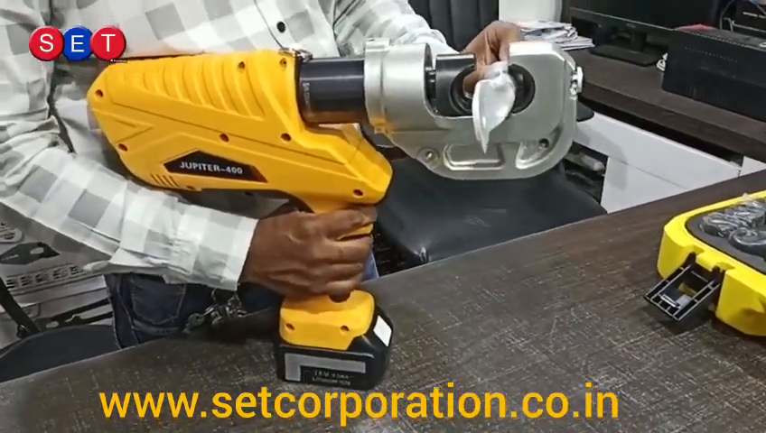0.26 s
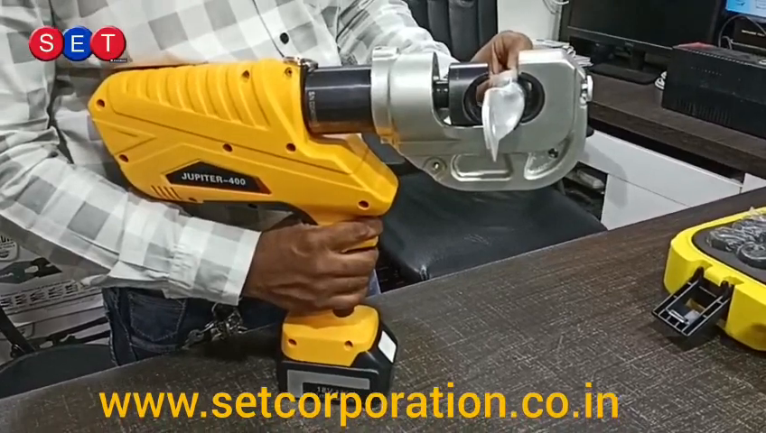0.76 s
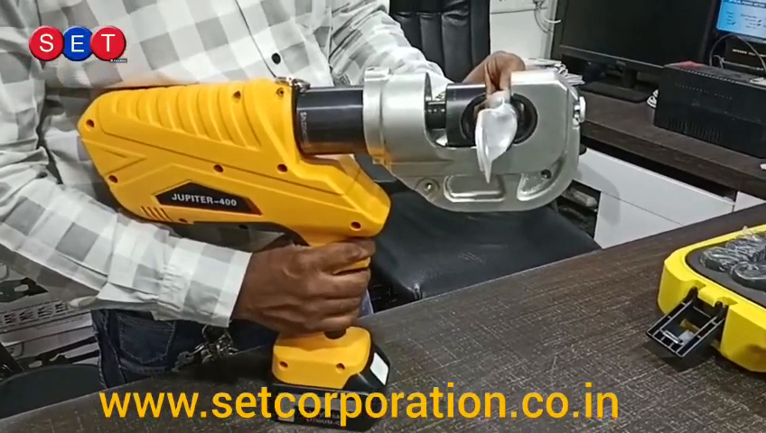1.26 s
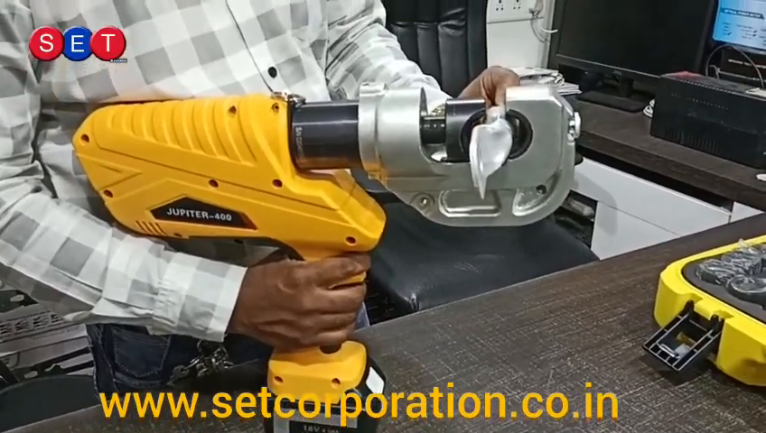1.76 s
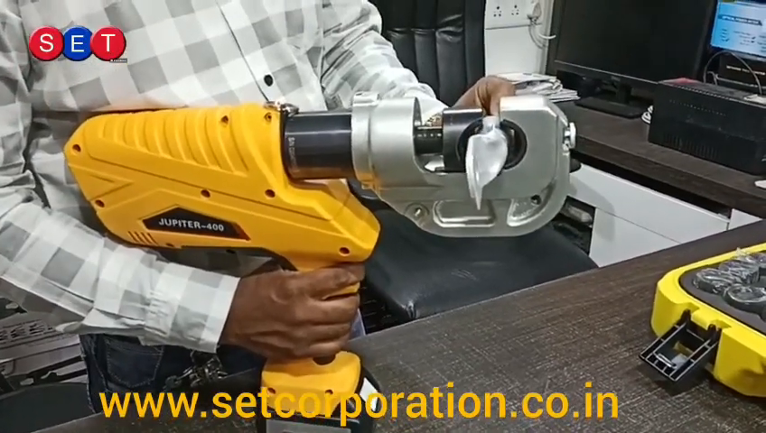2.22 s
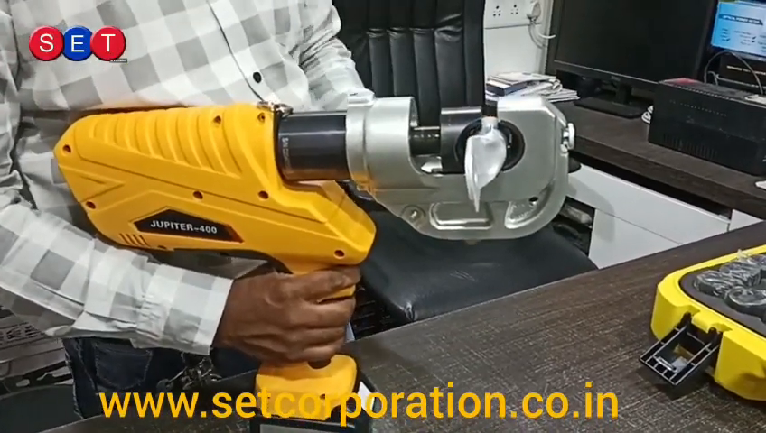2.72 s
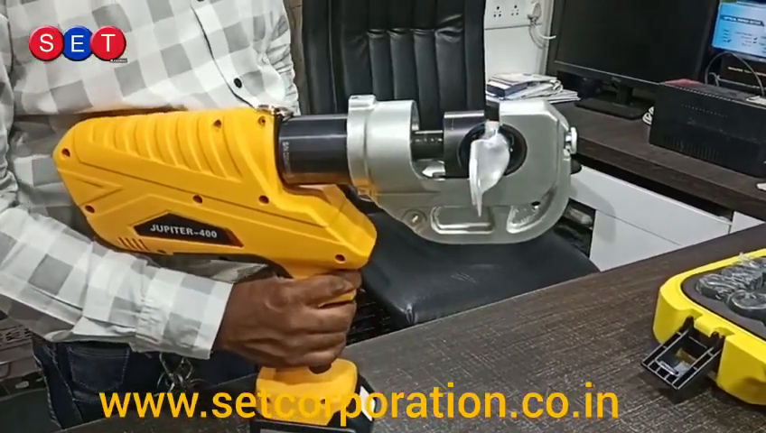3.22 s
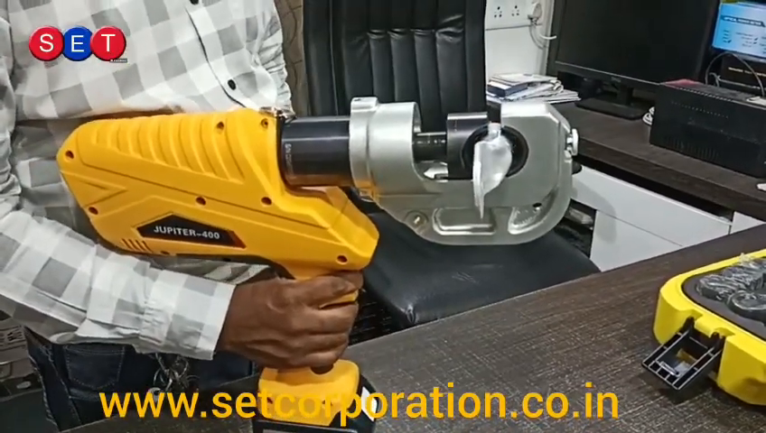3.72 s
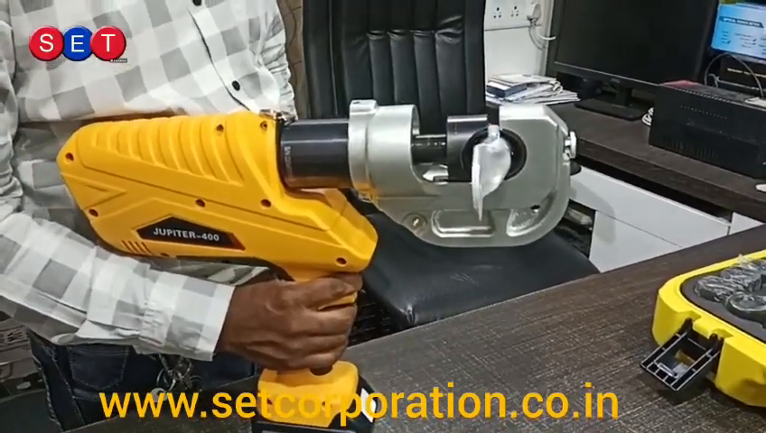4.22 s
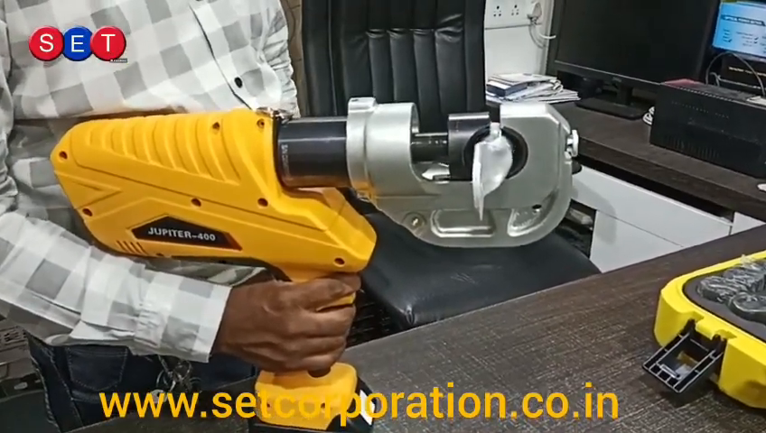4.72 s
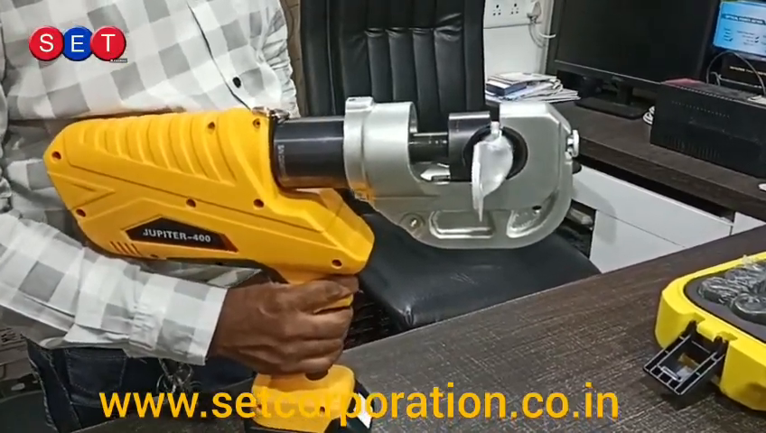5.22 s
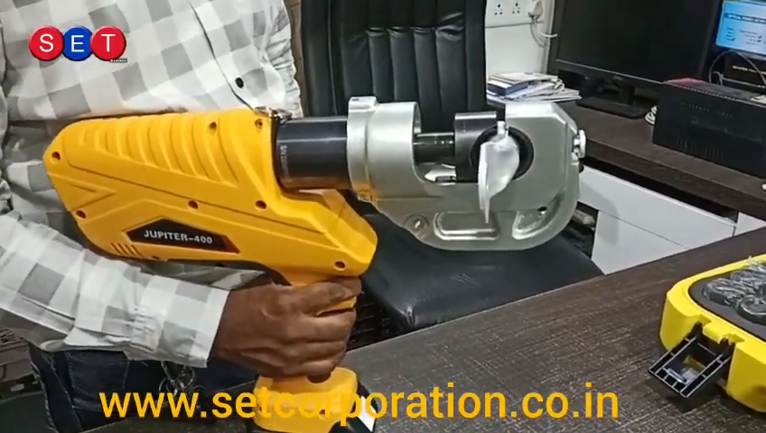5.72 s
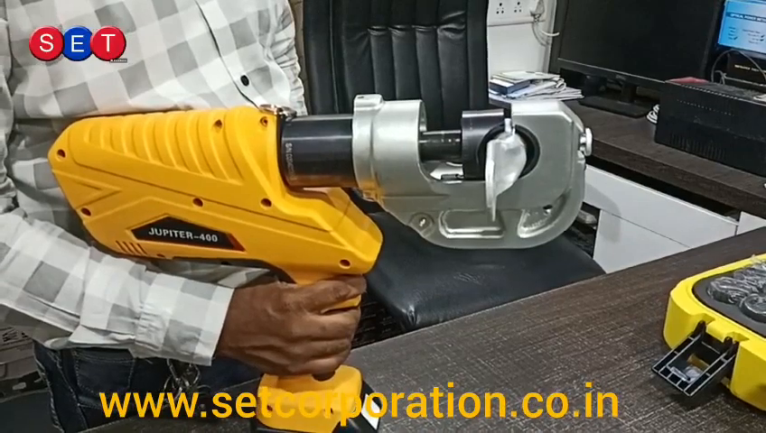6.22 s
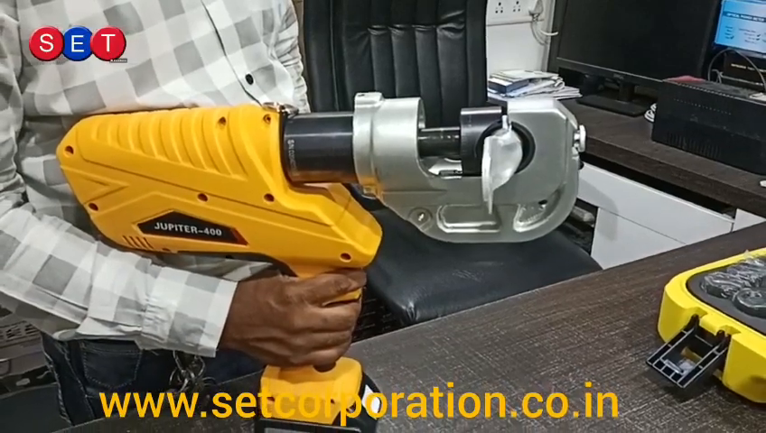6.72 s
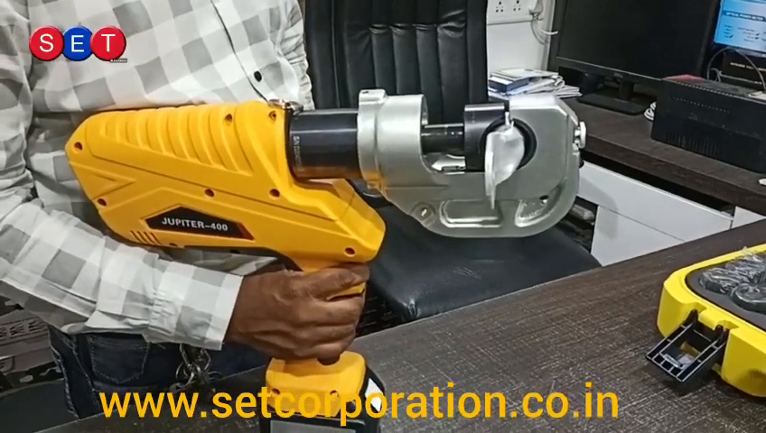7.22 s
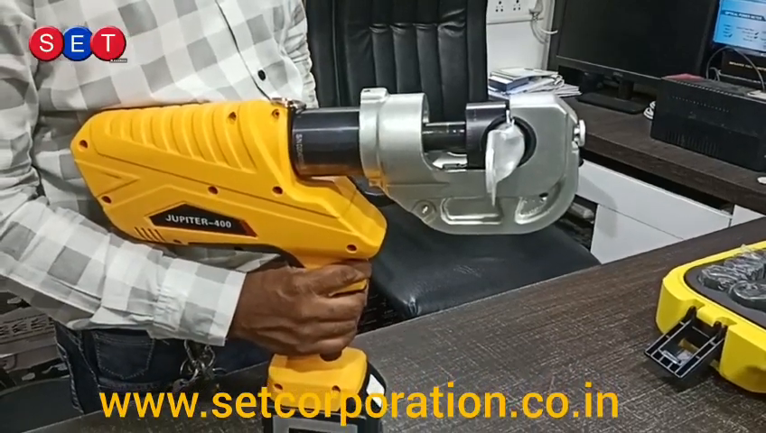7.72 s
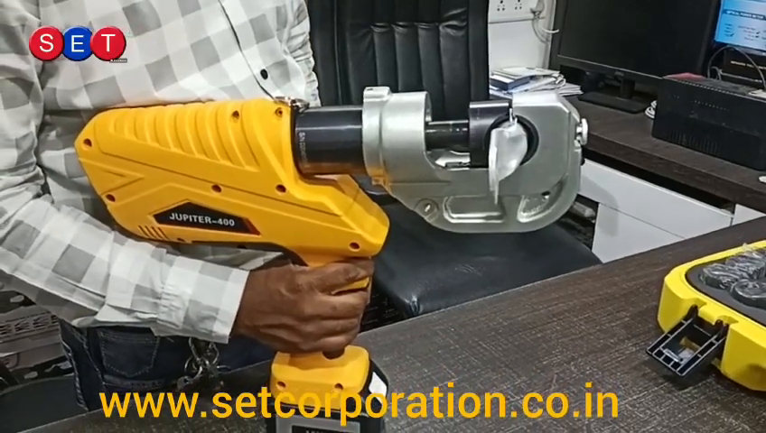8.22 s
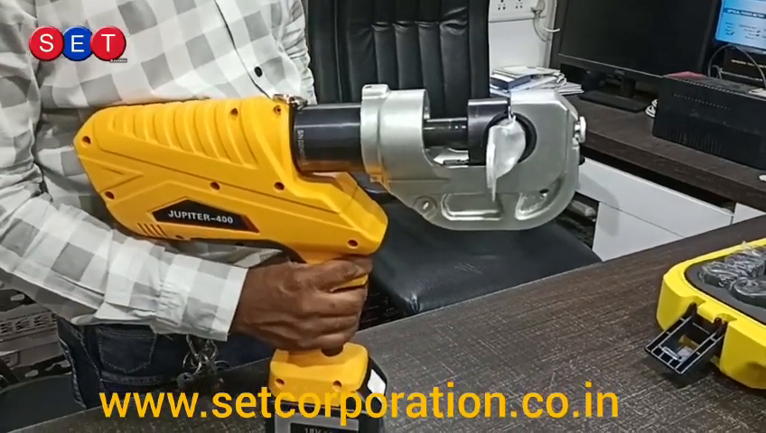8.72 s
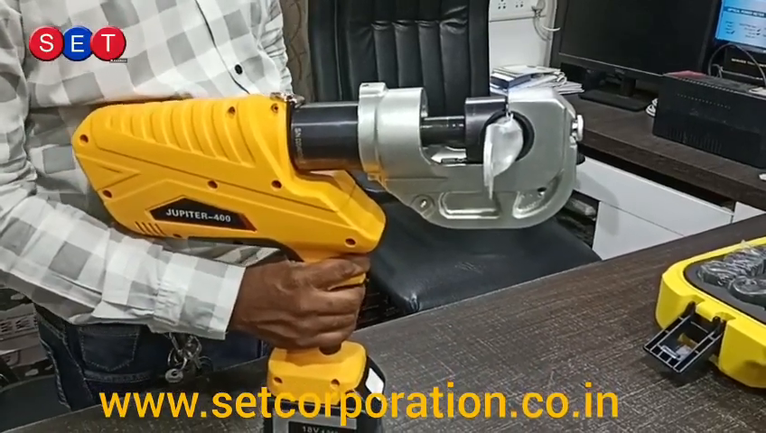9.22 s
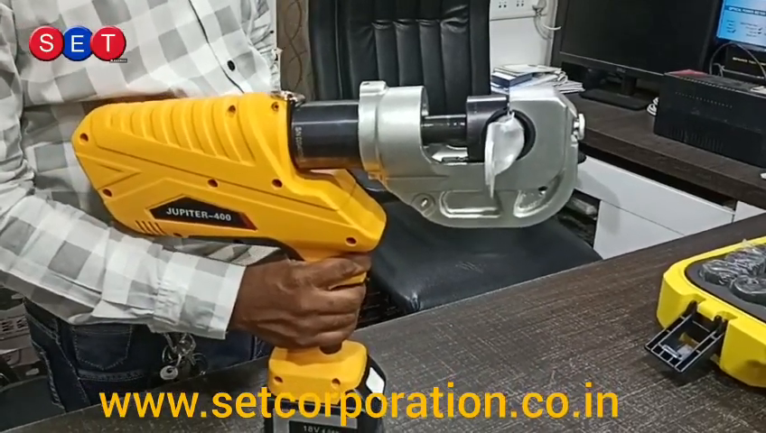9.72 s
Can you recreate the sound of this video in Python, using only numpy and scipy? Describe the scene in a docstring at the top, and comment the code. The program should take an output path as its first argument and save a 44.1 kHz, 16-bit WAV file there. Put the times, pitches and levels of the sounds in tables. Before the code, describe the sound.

The motor is already running at the start: bright, raspy housing rattle, high gear whine and a purring pump around eighteen beats a second. Steel valve ticks sharpen over the first few seconds, then the whine drops slightly and leans left. Towards the end the strokes slow a little, the throb deepens and squealing oil tones flutter in each stroke. It never stops. Close stereo microphones, dry small office.

```python
"""Hydraulic press in a small office

A hand-held press works under rising load, close to a pair of microphone ports.
A geared motor whines over the noise rattle of its housing; each pump stroke drags the pitch down.
Two valves knock in every stroke as struck steel modes, and gliding fuzzy tones give the oil's
brief whistles, which change as pressure builds. Low bumps of hands lie over a faint rumble."""
import sys
import numpy as np
from scipy import signal
from scipy.fft import rfft, irfft
from scipy.io import wavfile
from scipy.ndimage import uniform_filter1d

SR = 44100
rng = np.random.default_rng(int(sys.argv[2]) if len(sys.argv) > 2 else 0)


def store_wav(level_fs):
    """Save 16-bit WAV to argv[1]."""
    pcm = np.round(np.clip(np.atleast_2d(level_fs), -1, 1) * 32767)
    wavfile.write(sys.argv[1], SR, pcm.T.astype(np.int16))


def decibels_to_gain(level_db):
    """Convert a level in decibels to a linear amplitude gain (20 dB per decade)."""
    exponent = np.asarray(level_db, float) / 20
    return 10 ** exponent


N = 439236
T = np.arange(N) / SR
HZ = np.fft.rfftfreq(N, 1 / SR)

# hands shift on the tool and the table: (time [s], length [s], peak level [dB])
HAND_BUMPS = [(.05, 0.45, -65), (0.33, 0.21, -59), (0.573, 0.17, -53), (.9, 0.41, -62), (1.79, .1, -70),
              (2.202, 0.082, -68), (2.519, .1, -67), (3.08, 0.23, -58), (3.354, 0.13, -60),
              (3.52, .15, -61), (3.83, 0.33, -65), (4.0, 0.53, -60), (4.44, 0.29, -56), (7.4, 0.11, -69)]
# pump strokes done so far: (time [s], count [strokes])
STROKE_COUNT = [(0.0, -0.14), (1.0, 18.23), (2.0, 36.51), (3.0, 54.91), (4.0, 73.18), (5.0, 91.25),
                (6.0, 109.15), (7.0, 126.87), (7.5, 135.64), (8.0, 144.29), (8.5, 152.79), (9.0, 161.11),
                (9.5, 169.3), (9.96, 176.74)]
# oil pressure and what follows it:
# (time [s], load [0-1], rattle level [dB], rattle left-right [dB], valve knock level [dB])
PRESS_LOAD = [(0, 0.18, -21, -0.5, -44), (1, 0.15, -20.5, -1.5, -41), (2, 0.29, -21, -1, -38.5),
              (3, 0.48, -21.5, -1, -35), (4, 0.44, -22, 1.5, -34), (5, 0.49, -22.5, 1, -34),
              (6, 0.5, -22.5, 2, -35.5), (7, 0.65, -22.5, 1.5, -37), (8, 0.84, -22, 1.5, -36.5),
              (9, 0.96, -22, 3, -40.5), (9.96, 0.95, -21.5, 1.5, -34)]
# brief whistles of oil and pump, once a stroke: (place in the stroke [strokes], length [strokes],
# start [Hz], end [Hz], level before fuzz and low cut at no load [dB], at full load [dB])
WHISTLES = [(0, .42, 1640, 1400, -75, -24.5), (.0, 0.24, 3960, 3900, -80, -27.5),
            (0.1, .34, 3420, 3200, -130, -25), (-0.039, .26, 700, 680, -67, -33),
            (-0.043, 0.39, 7700, 6000, -80, -36), (0.49, .3, 1120, 1200, -23.5, -68),
            (0.2, .34, 1540, 1500, -25, -62), (.24, .24, 860, 840, -25, -90)]
# modes of the steel pump head:
# (frequency [Hz], t60 [s], relative level for the outlet valve [dB], for the inlet valve [dB])
HEAD_MODES = [(1100, .016, -16, -14), (1580, .026, -4, -10), (1740, .03, -4, -10), (2060, .02, -6, -9),
              (2240, .045, -5, -4), (2540, .03, -4, -7), (2750, .035, -3, -2), (2880, .03, -11, -5),
              (3250, .025, -11, -5), (3420, .024, -6, -9), (3720, .02, -14, -12), (4700, .008, -24, -3),
              (5480, .018, -2, -16), (5760, .012, -5, -14), (7800, .008, -20, -24)]
# valve closings, which move as pressure builds: (time [s], outlet place [strokes], inlet place [strokes],
# inlet against the knock [dB], high head modes for the outlet [dB], for the inlet [dB])
VALVE_TIMING = [(0, .2, .48, 1, -8, -8), (2, .23, .48, -4, -7, -5), (3.5, .25, .48, -8, -5, 0),
                (4.7, .195, .44, -8, 1, 4), (6, .155, .38, -6, 5, 4), (7.2, .135, .35, -4, 5, 4),
                (8, .12, .335, 3, -1, 2), (9.96, .13, .35, 1, -8, 5)]
# rattle spectrum under light load: (frequency [Hz], relative density [dB per Hz])
LIGHT_RATTLE = [(88, -62), (150, -34.5), (345, -13.5), (461, -9.5), (628, -7.5), (1360, -10), (1720, -6),
                (4600, -13.5), (5270, -1), (5700, -11), (7330, -14.5), (7920, -35.5), (10600, -23),
                (13100, -23), (15300, -33)]
# rattle spectrum under heavy load: (frequency [Hz], relative density [dB per Hz])
HEAVY_RATTLE = [(88, -66), (150, -45), (273, -17), (479, -24), (628, -1.5), (889, -19), (1500, -0.5),
                (1970, -4), (3940, -5.5), (4350, -10), (4950, -7.5), (5330, -6), (6780, -11), (9060, -32),
                (12100, -18.5), (15300, -24.5)]
# housing resonances and hollows:
# (frequency [Hz], width [Hz], boost at light load [dB], boost at heavy load [dB])
HOUSING_MODES = [(258, 133, 12, 3.5), (321, 17, -4, -2.5), (397, 14, 9.5, -1), (452, 106, -14, -17),
                 (620, 41, 1, 1.5), (686, 29, 3, 3.5), (814, 27, 8, 5.5), (900, 210, -5.5, 2.5),
                 (993, 112, 8, 13.5), (1231, 42, 7, 5), (1572, 35, 6, 0), (1748, 113, 8, 6.5),
                 (2020, 28, 0, 3), (2242, 53, 5.5, 9), (2460, 43, 0, 4), (2680, 34, -14, 3.5),
                 (2860, 82, -1.5, 2.5), (3175, 130, 7.5, 5.5), (5120, 170, 2.5, 5.5), (6720, 520, 2.5, 1.5),
                 (9890, 410, -16, -3.5), (9770, 260, 7, 8)]
# gear mesh: (time [s], pitch running free [Hz], level [dB], left-right [dB])
GEAR_WHINE = [(0, 5320, -27, -9), (.6, 5340, -24.5, -1), (2.0, 5342, -22.5, 4), (2.7, 5332, -25, 1),
              (3.2, 5328, -27, 15), (3.7, 5330, -26, 3.5), (4.1, 5285, -31, 15), (5, 5233, -30.5, 14.5),
              (6, 5232, -29, 14.5), (6.6, 5218, -28, 9.5), (7.2, 5185, -34.5, 19.5), (7.7, 5145, -36.5, 18),
              (8.1, 5105, -37, 8), (8.8, 5080, -38, 8), (9.96, 5065, -40, 2)]
# other motor tones: (time [s], overtone level [dB], shaft tone level [dB],
# swing of the whine's level within a stroke [dB])
MOTOR_TONES = [(0, -48, -40, 2.5), (1.5, -51, -39.5, 3), (2.7, -43, -41, -0.5), (3.1, -49, -44, -4),
               (3.9, -50, -46, -6.5), (4.6, -52, -45.5, 0.5), (6.4, -66, -44, 6), (7, -60, -49, 2),
               (7.5, -58, -51, 15), (8, -62, -51.5, 9), (9.96, -67, -61.5, 13)]
# two fuzzy gear tones that follow the shaft: (order of each [cycles per shaft turn])
GEAR_ORDERS = (4.98, 8.66)
# their levels at the left port: (time [s], first tone [dB], second tone [dB])
GEAR_LEVELS = [(0, -40, -52), (1, -36, -48), (2.3, -37, -40), (4.3, -38, -38), (6, -40, -38),
               (6.9, -41, -37), (7.4, -45, -47), (9.96, -55, -58)]
# port pair: (frequency [Hz], likeness [0-1], lag of the left [rad],
# swing of that lag by the desk echoes [rad], left-right [dB])
PORT_PAIR = [(100, 0.9, .1, .05, -2.5), (209, 0.93, 0.29, 0.14, 6.5), (530, 0.77, 0.31, 0.6, -2.5),
             (900, 0.81, 0.91, 0.16, -1.5), (1545, 0.49, 1.84, 0.06, -1.5), (1825, 0.77, 2.9, 0.9, 2.5),
             (2550, 0.38, 5.15, 2.85, 1.5), (3300, 0.36, 2.2, 5.3, -4), (4100, 0.48, 1.84, 0.66, 3),
             (4800, 1, 2, 0.61, -6), (5130, 0.47, 13.1, 2.5, 3), (6920, 0.34, 7.2, 4.2, 1.5),
             (8860, 0.5, 28, 1.3, 13.5), (11470, 0.4, 6.6, 1, 3.5), (14600, .25, 14.7, 1.4, 2)]
# desk echoes: (delay of each [s])
DESK_ECHOES = (.0031, .0053, .0082)


def evened(x):
    """Scales to rms 1."""
    return x / np.sqrt(np.mean(x ** 2) + 1e-20)


def curves(rows):
    """Columns of a time table, one value a sample."""
    s, *columns = np.transpose(rows)
    return [np.interp(T, s, c) for c in columns]


def drift(hz, channels=1):
    """Slow chance: noise rolled off above hz, rms 1."""
    spectrum = rfft(rng.standard_normal((channels, N)))
    return evened(irfft(spectrum / (1 + (HZ / hz) ** 2), N))


def fuzzy(center, depth, hz, channels):
    """Complex gain that wanders in size and phase, to make a tone fuzzy."""
    return center + depth * (drift(hz, channels) + 1j * drift(hz, channels))


def stroke():
    """Strokes done; the pump's speed changes smoothly."""
    rate = np.gradient(curves(STROKE_COUNT)[0]) * SR
    rate = uniform_filter1d(rate, size=SR // 2, mode="nearest")
    return STROKE_COUNT[0][1] + np.cumsum(rate) / SR


def office(x):
    """Direct sound plus a short tail of its own at each port: fixed bands that a gliding tone beats through."""
    t60_s, tail_db, start_s = .25, -11, .004
    t = T[:SR // 2]
    tail = rng.standard_normal((2, len(t))) * decibels_to_gain(-60 * t / t60_s) * (t > start_s)
    tail = decibels_to_gain(tail_db) * tail / np.linalg.norm(tail, axis=1, keepdims=True)
    echoed = signal.oaconvolve(x, tail, axes=1)[:, :N]
    return (x + echoed) / np.sqrt(1 + decibels_to_gain(2 * tail_db))


def ports(pair):
    """Two renderings of one source: the right port hears part of the left's sound, earlier, and part of its own."""
    hz, *columns = np.transpose(PORT_PAIR)
    like, lag, spread, pan_db = (np.interp(HZ, hz, c) for c in columns)
    # the echoes swing the phase between the ports back and forth
    turns = sum(np.sin(2 * np.pi * HZ * s) for s in DESK_ECHOES) / np.sqrt(len(DESK_ECHOES))
    left, other = rfft(pair)
    shared = like * np.exp(1j * (lag + spread * turns)) * left
    right = shared + np.sqrt(1 - like ** 2) * other
    return irfft([left * decibels_to_gain(pan_db / 2), right * decibels_to_gain(-pan_db / 2)], N)


def no_bass(x, hz):
    """Takes away the sound below hz, steeply."""
    return irfft(rfft(x) * (HZ / hz) ** 4 / (1 + (HZ / hz) ** 4), N)


def rumble():
    """Low lumps: each bump swells and fades over a faint, uneven floor of band-limited noise."""
    floor_db, lumps_db = -82, 4
    band = (HZ / 85) ** 2.6 / (1 + (HZ / 85) ** 2.0) / (1 + (HZ / 130) ** 3)
    level = decibels_to_gain(floor_db + lumps_db * drift(9))
    for s, length, db in HAND_BUMPS:
        level = level + decibels_to_gain(db) * np.exp(-(2 * (T - s) / length) ** 2)
    return level * evened(irfft(rfft(rng.standard_normal((2, N))) * band, N))


def squeal():
    """Short fuzzy whistles glide through their part of the stroke; pressure brings some in and stills others."""
    load, done = curves(PRESS_LOAD)[0], stroke()
    out = np.zeros((2, N))
    for place, share, start_hz, end_hz, light_db, heavy_db in WHISTLES:
        part = np.clip((done - place) % 1 / share, 0, 1)
        phase = 2 * np.pi * np.cumsum(start_hz + (end_hz - start_hz) * part) / SR
        tone = (fuzzy(1.1, .6, 150, 2) * np.exp(1j * phase)).real
        level = decibels_to_gain(light_db + (heavy_db - light_db) * load)
        out += level * np.sin(np.pi * part) ** 0.86 * tone
    return out


def valves():
    """Twice a stroke a ball valve slams and chatters for a few ms; the steel head rings differently each time."""
    scatter_db, detune, late_s = 2, .008, .0006  # rms spread of mode level, mode pitch [share] and timing
    sag_per_s = 2.5  # the ring falls as pressure lets go
    high_hz = 4200
    knock_db, done = curves(PRESS_LOAD)[3], stroke()
    outlet, inlet, inlet_db, *high_db = curves(VALVE_TIMING)
    t, out = T[:1400], np.zeros((2, N))
    hz, t60, *mode_db = np.transpose(HEAD_MODES)[:, :, None]
    signs = (-1) ** np.arange(len(HEAD_MODES))[:, None]
    is_high = hz[:, 0] > high_hz
    for k, (place, db) in enumerate([(outlet, 0), (inlet, inlet_db)]):
        rings, power = np.zeros((2, N + 2 * len(t))), 0
        closings = np.flatnonzero(np.diff(np.floor(done - place)) > 0)
        for start in closings:
            late, size_db = rng.standard_normal(2)
            gain, tune = rng.standard_normal((2, len(HEAD_MODES), 1))
            turns = hz * (1 + detune * tune) * (t - sag_per_s * t ** 2 / 2)
            decay = decibels_to_gain(mode_db[k] + scatter_db * gain - 60 * t / t60)
            modes = signs * decay * np.sin(2 * np.pi * turns)
            blow = np.exp(-t[:600] / .003) * rng.standard_normal((2, 600))
            blow[:, 0] += 13  # the slam ahead of the chatter
            low = signal.fftconvolve(blow, modes[~is_high].sum(0)[None], axes=1)
            high = signal.fftconvolve(blow, modes[is_high].sum(0)[None], axes=1)
            power += np.sum(low ** 2) / (2 * N)
            first = max(start + int(late_s * SR * late), 0)
            ring = low + decibels_to_gain(high_db[k][start]) * high
            rings[:, first:first + low.shape[1]] += decibels_to_gain(size_db) * ring
        out += decibels_to_gain(knock_db + db) * rings[:, :N] / np.sqrt(power)
    return out


def rattle():
    """Dense small tooth and bearing impacts, as noise, colour the housing; louder while the pump pushes."""
    load, db, pan_db, _ = curves(PRESS_LOAD)
    done = stroke()
    grain = decibels_to_gain(.8 * drift(200) + .4 * drift(16))
    noise = grain * rng.standard_normal((2, N))
    bass = 1 / (1 + (HZ / 520) ** 6)
    middle = 1 / (1 + (1250 / (HZ + 1)) ** 6) / (1 + (HZ / 4200) ** 8)
    treble = 1 - 1 / (1 + (HZ / 6500) ** 8)
    between = 1 - middle - bass - treble
    # the push loads the gears: the middle throbs most, and the bass turns lumpy under load
    throb = load ** 2 * np.cos(2 * np.pi * (done - .27))
    bass_db = (2.3 + 1.2 * load ** 4) * drift(19)
    middle_db = 3.2 * throb
    between_db = .3 * throb + 1.3 * drift(15.0)
    treble_db = 1.2 * np.cos(2 * np.pi * (done - .2)) + .5 * drift(3.9)
    hits = bass * rfft(noise * decibels_to_gain(bass_db))
    hits += middle * rfft(noise * decibels_to_gain(middle_db))
    hits += between * rfft(noise * decibels_to_gain(between_db))
    hits += treble * rfft(noise * decibels_to_gain(treble_db))
    hz, width, *boosts_db = np.transpose(HOUSING_MODES)
    layers = []
    for table, boost_db in zip((LIGHT_RATTLE, HEAVY_RATTLE), boosts_db):
        f, level_db = np.transpose(table)
        slope_db = np.interp(np.log(HZ + 1), np.log(f), level_db)
        body_db = sum(b / (1 + (2 * (HZ - c) / w) ** 2) for c, w, b in zip(hz, width, boost_db))
        layers.append(evened(irfft(hits * decibels_to_gain(slope_db + body_db), N)))
    light, heavy = layers
    sides = decibels_to_gain(db + np.outer([.5, -.5], pan_db))
    return sides * ((1 - load) * light + load * heavy)


def motor():
    """Gear mesh tone, its overtone, the shaft tone and two gear tones; the pump's push slows them once a stroke."""
    teeth = 15
    idle_hz, drop_hz, drop_per_hz, deepest_hz = 5330, 120, .36, 210
    top_hz, db, pan_db = curves(GEAR_WHINE)
    over_db, shaft_db, swing_db = curves(MOTOR_TONES)
    # each push drags the pitch down, the more the slower the motor runs, to a limit
    drag_hz = np.minimum(drop_hz + drop_per_hz * (idle_hz - top_hz), deepest_hz)
    done = stroke()
    turn = 2 * np.pi * (done + 0.092)
    swing = np.cos(turn) - .26 * np.cos(2 * turn) + .24 * np.sin(2 * turn)  # flat top, quick fall, slow climb
    hz = top_hz - drag_hz * (swing.max() - swing) / np.ptp(swing) + 9 * drift(40)[0]
    phase = 2 * np.pi * np.cumsum(hz) / SR

    # the level swings once a stroke, and the outlet knock unsettles the mesh
    slip = np.exp(-((done % 1 - curves(VALVE_TIMING)[0] - .06) / .06) ** 2)
    sing = decibels_to_gain(swing_db * np.cos(2 * np.pi * (done + 0.12)) - 4.5 * slip)
    steady = sing / np.sqrt(uniform_filter1d(sing ** 2, size=SR // 4))  # keeps the average level
    flutter = fuzzy(1, .1, 90, 2)  # reflections make each port flutter on its own
    sides = decibels_to_gain(np.outer([.5, -.5], pan_db))
    lead = np.array([[0], [.7]])  # radians, left and right
    mesh = (flutter * np.exp(1j * (phase + lead))).real
    mesh = np.sqrt(2) * decibels_to_gain(db) * sides * steady * mesh
    overtone = decibels_to_gain(over_db) * steady * (flutter[::-1] * np.exp(2j * phase)).real

    shaft = decibels_to_gain(shaft_db) * (1 + .12 * drift(6)) * np.cos(phase / teeth)
    fuzz = fuzzy(1, .5, 18, 4)
    gears = np.zeros((2, N))
    for k, (order, level_db) in enumerate(zip(GEAR_ORDERS, curves(GEAR_LEVELS))):
        tone = fuzz[2 * k:2 * k + 2] * np.exp(1j * order * phase / teeth)
        gears += decibels_to_gain(level_db) * tone.real
    return office(mesh + overtone) + shaft + gears * [[1], [.5]]  # gear tones weaker at the right port


def scene():
    """Noisy parts and whistles reach the two ports partly alike; the motor's tones carry their own balance."""
    whistles = no_bass(squeal(), hz=504)
    knocks = no_bass(valves(), hz=980)
    return ports(rumble() + whistles + knocks + rattle()) + motor()


def roll_off(x):
    """The treble ends steeply here."""
    return signal.sosfilt(signal.butter(12, 15500, fs=SR, output="sos"), x)


def record(dry):
    """The finished mix as the pair of ports delivers it."""
    return roll_off(dry)


dry = scene()
out = record(dry)
store_wav(out)
```